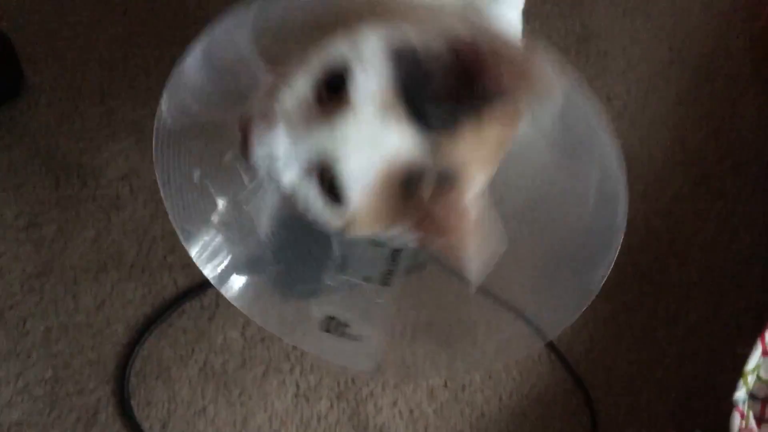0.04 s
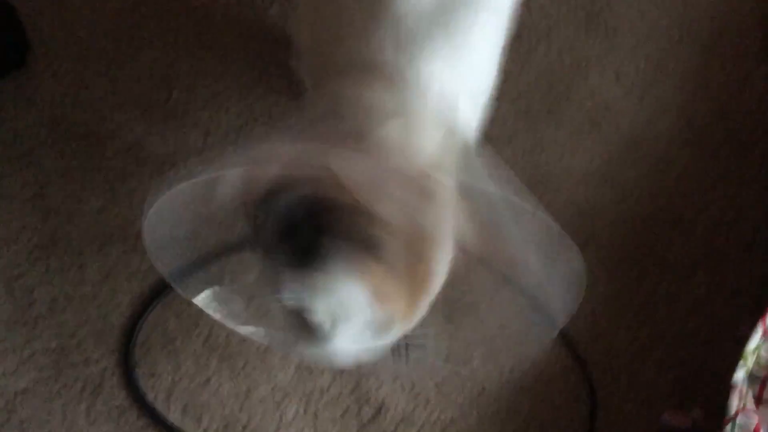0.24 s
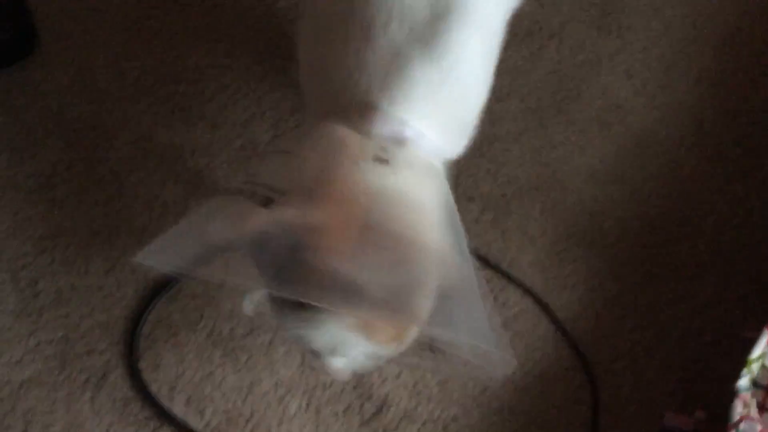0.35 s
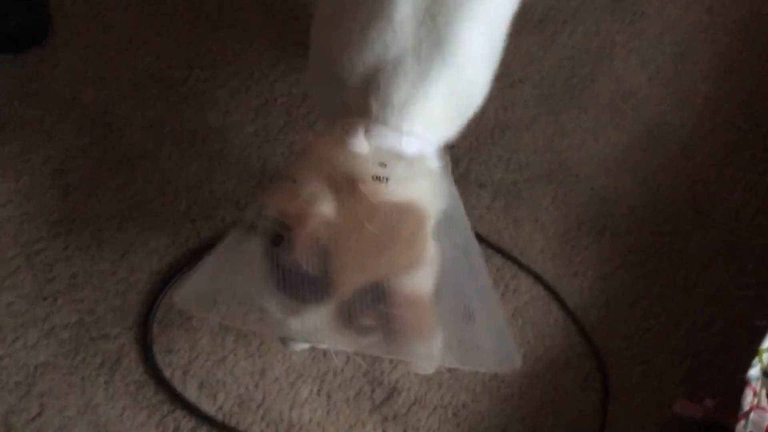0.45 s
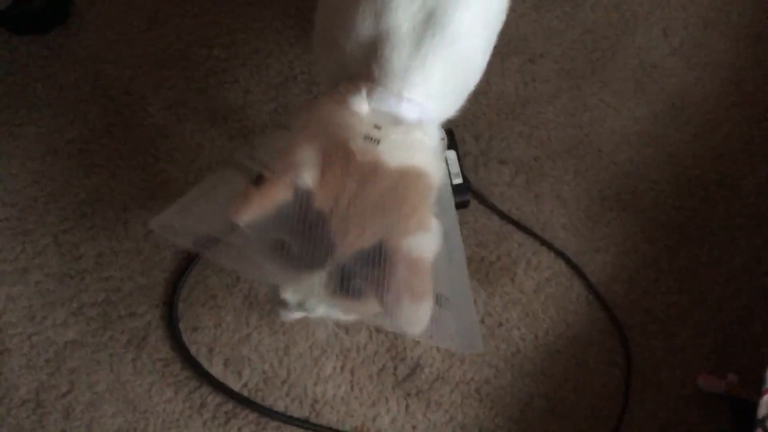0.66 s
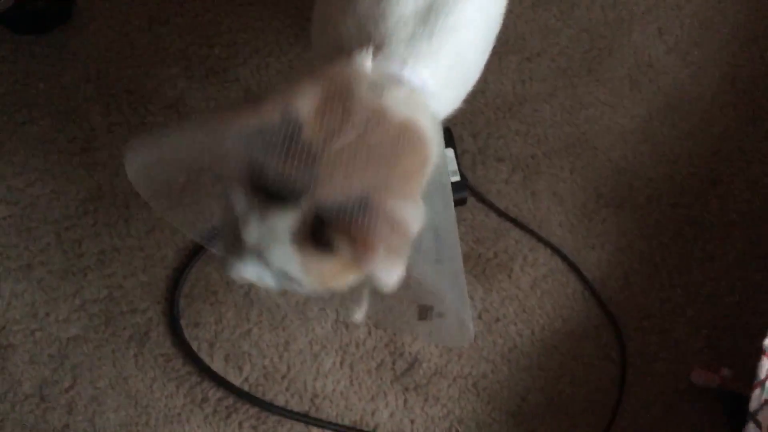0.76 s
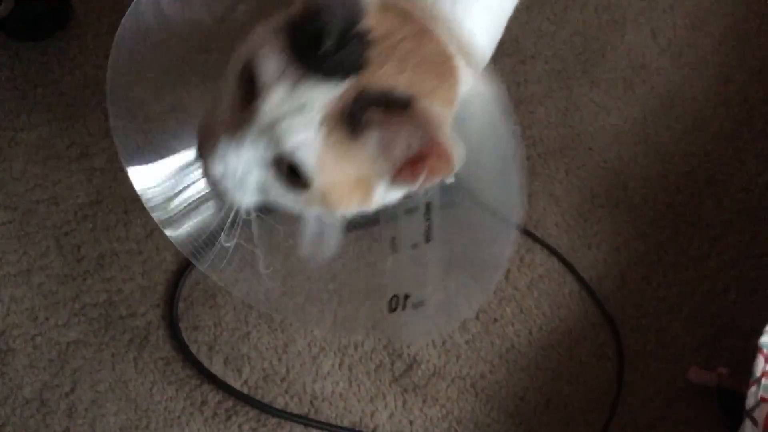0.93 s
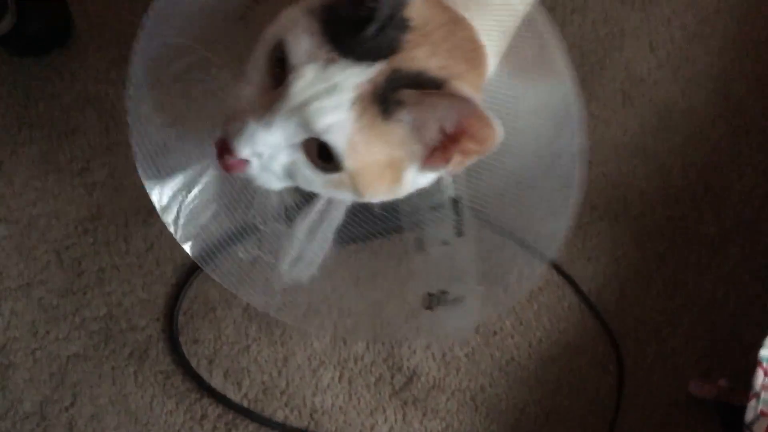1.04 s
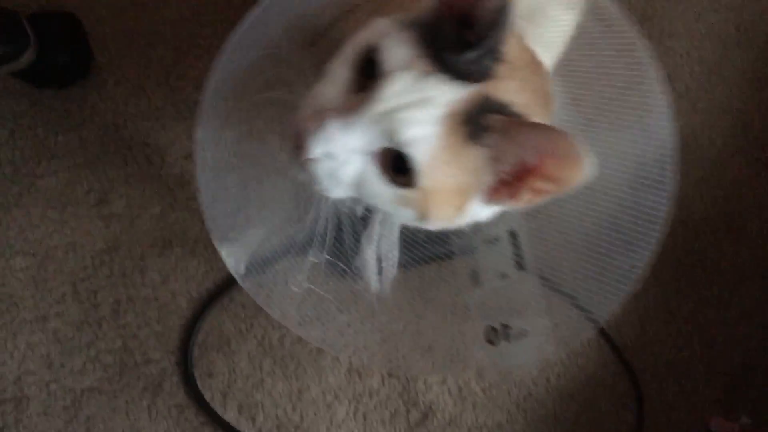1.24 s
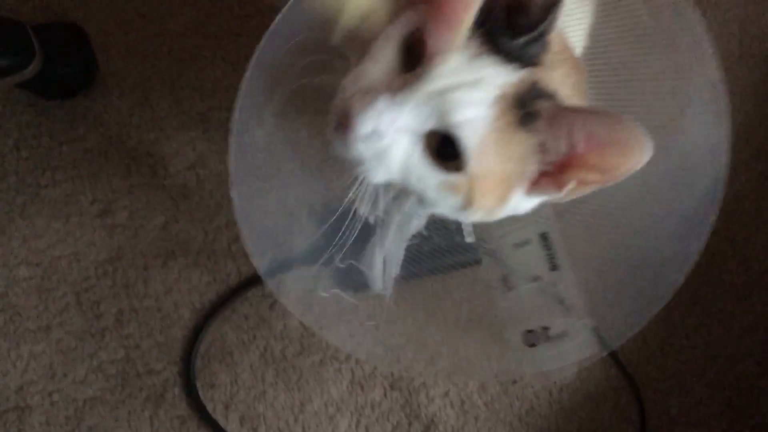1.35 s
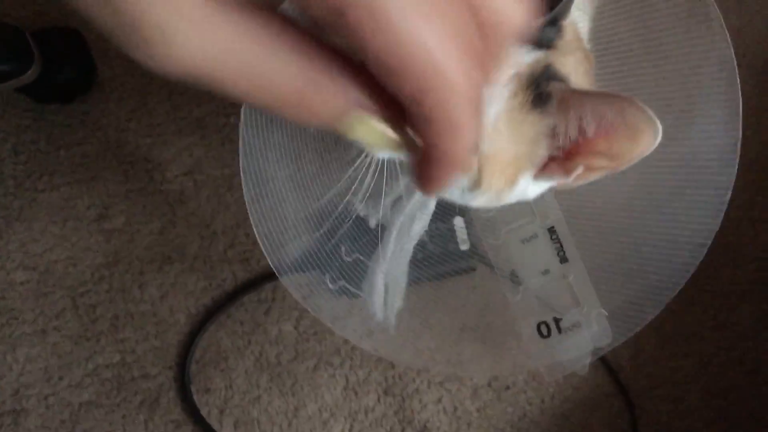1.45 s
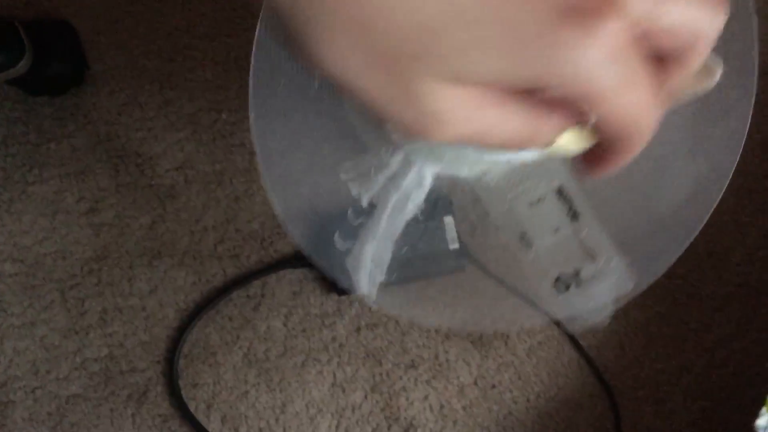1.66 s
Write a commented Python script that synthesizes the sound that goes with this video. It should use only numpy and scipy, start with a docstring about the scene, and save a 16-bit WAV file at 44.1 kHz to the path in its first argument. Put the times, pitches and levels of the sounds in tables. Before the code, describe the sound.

Plastic cone collar rattles briefly as a cat shakes its head, then scrapes lightly.

```python
"""A rustle of fur and a quick flurry of plastic slaps: a cat in a cone collar shakes its head.
It is on a carpet, close to one microphone in a small quiet room with a low rumble and hum.
Fur rubs inside the cone as it fans the air; the thin sheet slaps and buckles, and bending waves carry
each knock through it, treble first. A few more ticks and soft bumps on the carpet follow, then the
rim drags briefly, with fine crackles and faint squeaks."""
import sys
import numpy as np
from scipy import signal
from scipy.fft import rfft, irfft, next_fast_len
from scipy.io import wavfile

SR = 44100
rng = np.random.default_rng(int(sys.argv[2]) if len(sys.argv) > 2 else 0)


def wav_out(sig):
    """Save sig, one row per channel (or a flat mono array), as 16-bit PCM at SR to the path in sys.argv[1]."""
    wavfile.write(sys.argv[1], SR, np.round(np.clip(np.atleast_2d(sig).T, -1, 1) * 32767).astype(np.int16))


N = 74970

# rumble and hiss of the room: frequency_hz, level_db
ROOM_COLOUR = [(13, -57), (22, -40), (39, -4.5), (64, 0.5), (136, -26.5), (169, -15.5), (189, -35.5),
               (223, -24), (294, -19), (347, -34.5), (409, -38), (636, -35.5), (1380, -38), (1490, -37.5),
               (1810, -39.5), (9480, -45), (16000, -48)]
# fur rubbing inside the cone: time_s, level_db
FUR_LEVELS = [(.15, -74.5), (.18, -65), (.21, -57), (.228, -62.5), (.248, -50.5), (.262, -63), (.28, -62.5),
              (.32, -53), (.37, -56), (.42, -66.5), (.455, -43), (.48, -69), (.53, -78), (.6, -83)]
# spectrum of the fur: frequency_hz, level_db
FUR_COLOUR = [(100, 3), (400, -0.5), (1100, 3), (3000, -2), (6500, -5), (9000, -8.5), (10500, -14),
              (12500, -3.5), (16000, -40)]
# air fanned by the cone: time_s, level_db
AIR_LEVELS = [(.17, -68), (.245, -50.5), (.28, -54.5), (.32, -52.5), (.35, -39.5), (.38, -50.5),
              (.415, -50.5), (.5, -57.5), (.56, -60.5)]
# spectrum of the air: frequency_hz, level_db
AIR_COLOUR = [(30, -25), (80, 8), (180, -2.5), (300, -8), (700, -29.5), (2000, -49)]
# resonances of the cone: pitch_hz, width_hz, level_db
CONE_MODES = [(563, 54, 3.5), (913, 165, -2), (1100, 115, -0.5), (1402, 64, -0.5), (2035, 104, 1),
              (2365, 120, 0), (2580, 65, -2), (3304, 190, 3.5), (4340, 320, 2), (5470, 230, 0),
              (6240, 260, -0.5), (8300, 320, -1.5), (9180, 420, 2), (14100, 650, 6.5)]
# knocks on the cone: start_s, level_db, thump_db, body_db, snap_db, fizz_db, ring_db, travel_ms, echo_ms
# thump to fizz are relative to the clack band, ring to the first wave; travel is for a 1 kHz wave
CONE_KNOCKS = [ (0.1933, -26, -9, 10, 1, -11, 4, 1.5, .6),
               (0.2144, -20.5, 8.5, -0.5, -7, -11, -11, 3.2, 1.3),
               (0.229, -15, 2.5, 1.5, -3.5, -16.5, 3.5, 2.3, 0.4),
               (0.239, -22.5, 0, 0, -1, -6, -11, 0.81, 0.75),
               (0.2663, -18.5, 5.5, 1.5, -13, -8, -4, 1.67, 0.73),
               (0.2876, 4.5, -23, -8.5, -17, -19, -4.5, 1.616, 1.14),
               (0.2886, -1, -4, -6.5, -13.5, -20.5, 12, 1.753, 0.535),
               (.303, -9.5, 14.5, 3, -8.5, -12, -5.5, 1.196, 1),
               (.3291, -13, 7.5, 3, -13, -24, -10, 2.254, 1.02),
               (.3391, -3.5, -0.5, 2, -9.5, -10.5, -0.5, 2.4, 0.31),
               (.347, -14, 8, 0, -14, -12, -4, 1.52, 0.52), (0.3508, -13.5, 7.5, 3, -16, -17, 3, 0.955, .6),
               (0.3588, -7, -4, 0.5, -7.5, -16, 0, 2.6, 0.605),
               (.3848, -17.5, -1, 9, -15, -27, 11, 1.515, 0.96),
               (0.3887, -12.5, 5.5, 10, 6, -8, 1, 1.02, 0.366),
               (0.4006, -20.5, -9, -2, -2.5, -15, -2, 1.43, .7),
               (0.4375, -0.5, -6.5, -4, -6, -15.5, -2, 0.614, 0.5),
               (.4585, -1.5, -6, -1, -16, -26, 2.5, 2.2, 0.545),
               (.485, -15.5, -5, 8, -4.5, -17, -2.5, 2.42, 0.25),
               (0.4902, -7, -2, -16, -11, -26, -8.5, 1.55, 1.8),
               (0.5059, -20, 1.5, -0.5, -18, -16, 7, 2.56, 0.66),
               (0.6006, -4.5, -7.5, -10.5, -22.5, -30, -13, 1.6, 1.08),
               (.6172, -36.5, 14.5, 2, -18, -22, -5, 3.4, 0.74),
               (0.6413, -28, 8.5, 0.5, -12, -27, 4, 2, 1.25),
               (0.7025, -12.5, -3.5, -10, -18, -24.5, -10.5, 2.18, 0.642),
               (0.8211, -41, 12, 11.5, -8, -18, -8, 0.67, 0.92),
               (0.8347, -39, 17, 9, -16, -19, -9, 2.4, 0.33),
               (1.0347, -43.5, 10, 8, 21, 6.5, -3.5, 0.82, 0.16),
               (1.0448, -46.5, 10, 19, -7, -10.5, 3, 4, .5), (1.0851, -35, 9, 18.5, 2, -6, -10, 1.7, 0.5)]
# time the sheet takes to fall 60 dB: frequency_hz, decay_s
SHEET_DECAY = [(300, 0.021), (1000, 0.039), (3000, 0.011), (8000, 0.029), (15000, 0.012)]
# time the room takes to fall 60 dB: frequency_hz, decay_s
ROOM_DECAY = [(200, 0.083), (1000, 0.33), (3200, 0.27), (8000, 0.39), (15000, 0.095)]
# soft bumps on the carpet: peak_s, level_db
CARPET_BUMPS = [(0.792, -62.5), (0.871, -62.5), (0.885, -57)]
# spectrum of the bumps: frequency_hz, level_db
CARPET_COLOUR = [(80, -6), (300, 11.5), (650, 8), (1100, -17), (4000, -21), (12000, -54)]
# light scrapes of the rim: peak_s, level_db, rise_s, fall_s
RIM_SCRAPES = [(1.136, -59.5, 0.092, 0.049), (1.3, -77.5, 0.074, 0.051)]
# spectrum of the scrapes: frequency_hz, level_db
RIM_COLOUR = [(150, -4), (500, -2.5), (800, 2), (1100, 3), (1600, 0), (3000, -8), (4500, -6), (7000, -10.5),
              (10000, -16), (16000, -26)]
# crackles while the rim drags: peak_s, level_db
SHEET_CRACKLES = [(1.070, -67), (1.077, -65), (1.121, -63), (1.188, -64)]
# spectrum of the crackles: frequency_hz, level_db
SHEET_CRACKLE_COLOUR = [(2000, -30), (5500, -9), (9500, -1), (12500, 2), (16000, -9)]
# whistles of sliding plastic: peak_s, level_db, pitch_hz, width_hz, rise_and_fall_s
PLASTIC_SQUEAKS = [(1.204, -75, 3400, 350, 0.028), (1.295, -75.5, 3200, 180, 0.06),
                   (1.3, -75.5, 7550, 2000, 0.11)]

# the bands of a knock, low to high
BASS_HZ, THUMP_HZ, BODY_HZ, CLACK_HZ = 147, 520, 1180, 3130
WAIST_HZ, SNAP_HZ, FIZZ_HZ = 4820, 7500, 13700
BASS_DB, WAIST_DB = -4, 1.5
SHEET_DB, REVERB_DB = 2, -12.5
RIM_ECHO, TINT = 0.44, 0.25  # gain of the inverted echo; how far the resonances colour the first wave
LEAD_S = 0.00065  # the fastest waves arrive this long after the contact


def amp(db):
    """Decibels to gain."""
    return 10 ** (np.asarray(db) / 20)


def unit(x):
    """x at rms 1."""
    return x / np.sqrt(np.mean(x ** 2) + 1e-20)


def along(points, hz):
    """Interpolate (frequency_hz, value) points on a log frequency axis."""
    frequencies, values = np.transpose(points)
    return np.interp(np.log(hz + 1), np.log(frequencies + 1), values)


def level(rows):
    """Gain per sample from (time_s, level_db) rows."""
    return amp(np.interp(np.arange(N) / SR, *np.transpose(rows)))


def swell(peak_s, rise_s, fall_s, fade_db=10.5):
    """A gain of 1 at the peak, fade_db lower one rise time before and one fall time after."""
    t = np.arange(N) / SR - peak_s
    return amp(-fade_db * np.abs(t / np.where(t < 0, rise_s, fall_s)))


def filtered(x, response):
    """x through a frequency response."""
    size = next_fast_len(N + SR // 2)
    return irfft(rfft(x, size) * response(np.fft.rfftfreq(size, 1 / SR)), size)[:N]


def noise(colour):
    """Coloured noise of rms 1."""
    return unit(filtered(rng.standard_normal(N), lambda hz: amp(along(colour, hz))))


def causal(gain):
    """Minimum-phase response with this gain."""
    cepstrum = irfft(np.log(np.maximum(gain, 1e-6)))
    half = len(cepstrum) // 2
    cepstrum[1:half] *= 2
    cepstrum[half + 1:] = 0
    return np.exp(rfft(cepstrum))


def tail(decays, rise_s, size):
    """Spectrum of a diffuse decay with the same energy at every frequency."""
    hz, t, grains = signal.stft(rng.standard_normal(size), SR, nperseg=64)
    envelope = amp(-60 * t / along(decays, hz)[:, None]) * (1 - np.exp(-t / rise_s))
    envelope /= np.sqrt(np.mean(envelope ** 2, axis=1, keepdims=True) * size)
    return rfft(signal.istft(grains * envelope, SR)[1], size)


def resonance(hz, pitch_hz, width_hz):
    """A peak of height 1, width_hz wide at half height."""
    return 1 / (1 + (2 * (hz - pitch_hz) / width_hz) ** 2)


def cone_gain(hz, broadband_db=-3.5):
    """The cone's resonances over a flat base, at rms 1."""
    power = sum(amp(db) ** 2 * resonance(hz, pitch, width) for pitch, width, db in CONE_MODES)
    return unit(np.sqrt(power + amp(broadband_db) ** 2))


def friction(colour, slips_per_s, spread_db, hiss):
    """Tiny slips of random size and a smooth hiss, sounding through the cone."""
    slips = (rng.random(N) < slips_per_s / SR) * rng.choice([-1, 1], N)
    sizes = amp(spread_db * rng.standard_normal(N))
    drive = unit(slips * sizes) + hiss * rng.standard_normal(N)
    return unit(filtered(drive, lambda hz: amp(along(colour, hz)) * cone_gain(hz)))


def room_tone(noise_db=-58, hum_hz=60.4, hum_db=-64.5):
    """The quiet room at the microphone: low rumble, a hum and faint hiss."""
    hum = np.sqrt(2) * np.sin(2 * np.pi * (hum_hz * np.arange(N) / SR + rng.random()))
    return amp(noise_db) * noise(ROOM_COLOUR) + amp(hum_db) * hum


def fur_rub():
    """Fur rubs the inside of the plastic as the head shakes."""
    return level(FUR_LEVELS) * friction(FUR_COLOUR, slips_per_s=2000, spread_db=3.5, hiss=1.0)


def fanned_air():
    """The swinging cone fans the air in low puffs."""
    return level(AIR_LEVELS) * noise(AIR_COLOUR)


def cone_knocks(size=16384):
    """Each knock is a fast downward chirp and its rim echo; then the sheet rings and the room answers."""
    out = np.zeros(N + size)
    hz = np.fft.rfftfreq(size, 1 / SR)
    modes = cone_gain(hz)
    ringing, tint = causal(modes), causal(modes ** TINT)
    for start_s, level_db, thump, body, snap, fizz, ring_db, travel_ms, echo_ms in CONE_KNOCKS:
        colour = [(BASS_HZ / 2, thump + 2 * BASS_DB), (BASS_HZ, thump + BASS_DB), (THUMP_HZ, thump),
                  (BODY_HZ, body), (CLACK_HZ, 0), (WAIST_HZ, min(snap, 0) + WAIST_DB),
                  (SNAP_HZ, snap), (FIZZ_HZ, fizz)]
        contact = causal(amp(along(colour, hz)))
        bending = np.exp(-4j * np.pi * travel_ms * np.sqrt(hz / 1000))  # treble travels fastest
        echo = np.exp(-2j * np.pi * hz * echo_ms / 1000)
        first_wave = tint * (1 - RIM_ECHO * echo) / np.hypot(1, RIM_ECHO)
        sheet = amp(SHEET_DB) * tail(SHEET_DECAY, rise_s=0.00031, size=size)
        room = amp(REVERB_DB) * tail(ROOM_DECAY, rise_s=0.016, size=size)
        ring = amp(ring_db)
        response = (first_wave + ring * ringing * (sheet + room)) / np.hypot(1, ring)
        knock = irfft(contact * bending * response)[:size * 3 // 4]
        onset = round((start_s - LEAD_S) * SR)
        out[onset:onset + len(knock)] += amp(level_db) * knock
    return out[:N]


def carpet_bumps():
    """Soft touches on the carpet, each a dull burst of noise."""
    envelope = sum(amp(db) * swell(peak_s, rise_s=0.003, fall_s=0.0072) for peak_s, db in CARPET_BUMPS)
    return envelope * noise(CARPET_COLOUR)


def rim_scrapes():
    """The rim drags lightly as the head comes up."""
    strokes = sum(amp(db) * swell(peak_s, rise, fall) for peak_s, db, rise, fall in RIM_SCRAPES)
    return strokes * friction(RIM_COLOUR, slips_per_s=2200, spread_db=1, hiss=0.79)


def sheet_crackles():
    """The flexing sheet gives off fine, bright ticks."""
    envelope = sum(amp(db) * swell(peak_s, rise_s=0.001, fall_s=0.0028) for peak_s, db in SHEET_CRACKLES)
    return envelope * noise(SHEET_CRACKLE_COLOUR)


def plastic_squeaks():
    """The sliding plastic sings faintly in narrow bands."""
    out = np.zeros(N)
    for peak_s, level_db, pitch_hz, width_hz, fade_s in PLASTIC_SQUEAKS:
        band = filtered(rng.standard_normal(N), lambda hz: resonance(hz, pitch_hz, width_hz))
        out += amp(level_db) * swell(peak_s, fade_s, fade_s) * unit(band)
    return out


def scene():
    """The cat and the room at one close microphone."""
    shake = cone_knocks() + fur_rub() + fanned_air()
    settling = rim_scrapes() + plastic_squeaks() + carpet_bumps()
    return (shake + settling + room_tone() + sheet_crackles())[None]


def record(dry, top_hz=16100):
    """The recorder keeps nothing above its band limit."""
    return np.array([filtered(channel, lambda hz: hz < top_hz) for channel in dry])


dry = scene()
out = record(dry)
wav_out(out)
```